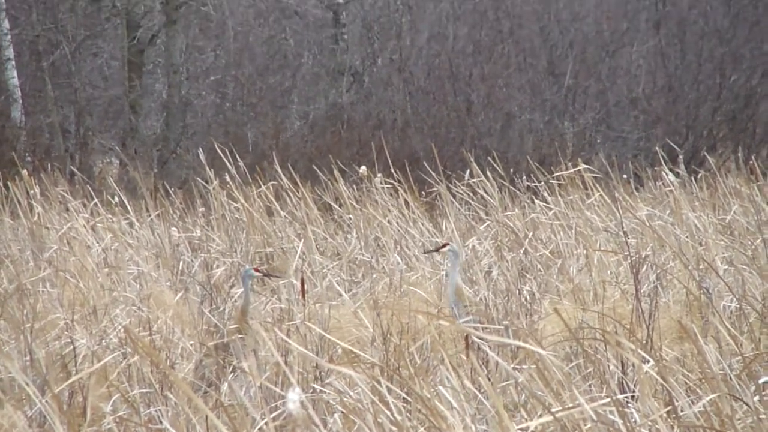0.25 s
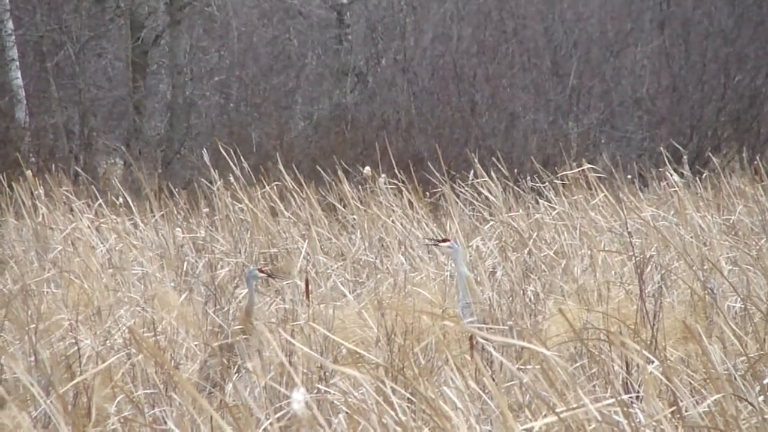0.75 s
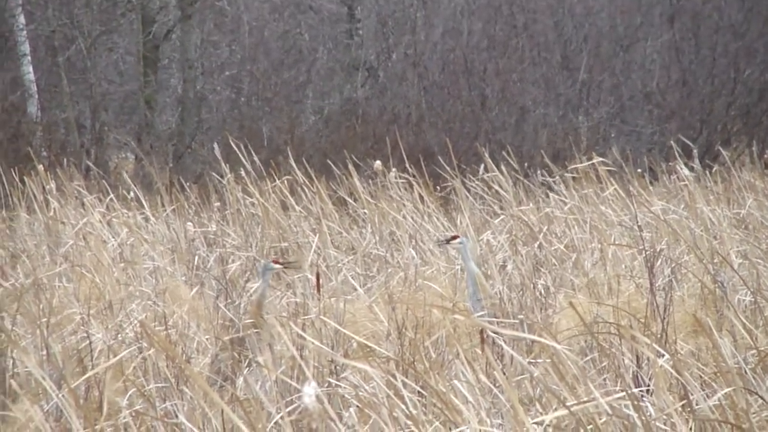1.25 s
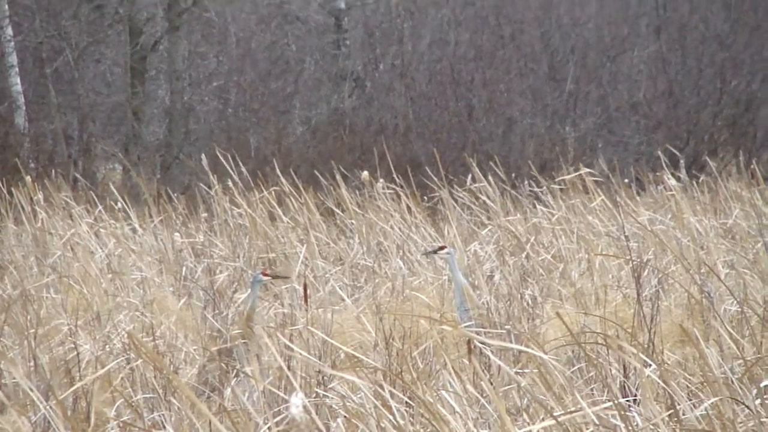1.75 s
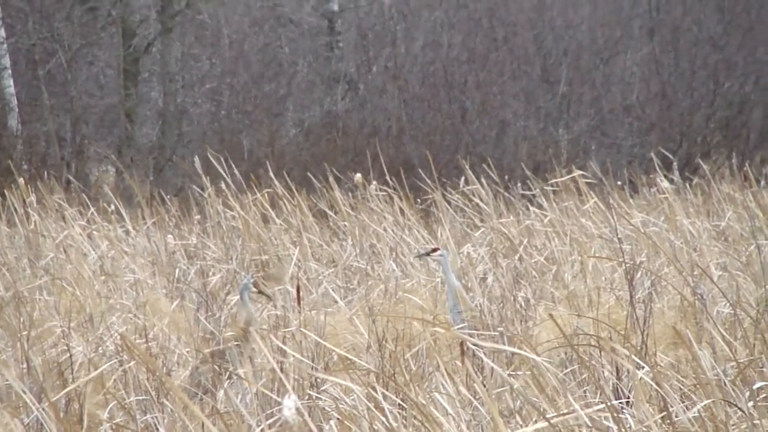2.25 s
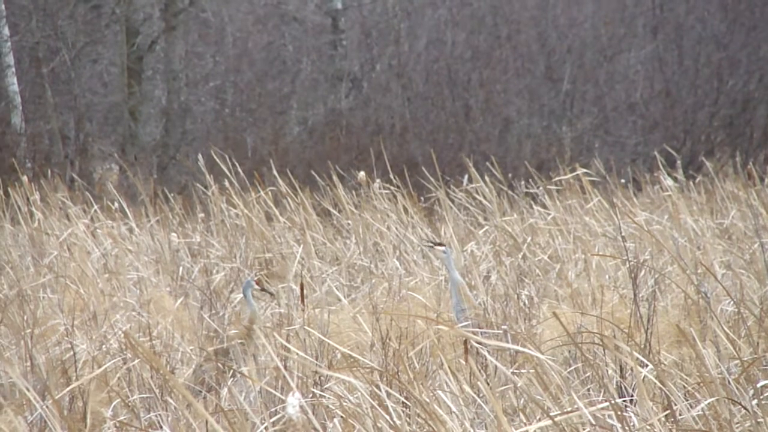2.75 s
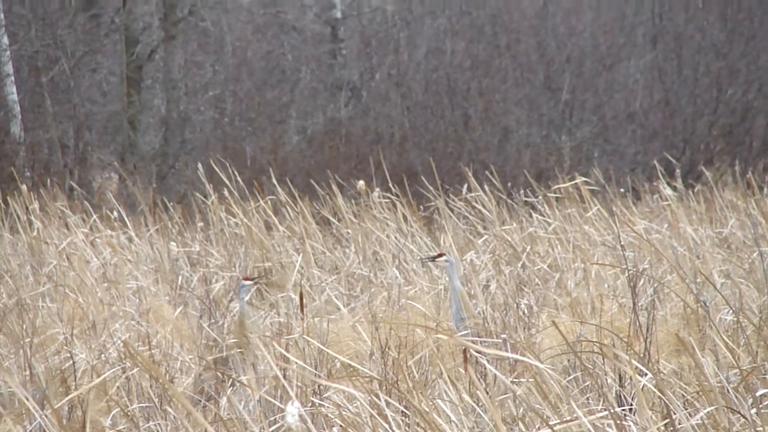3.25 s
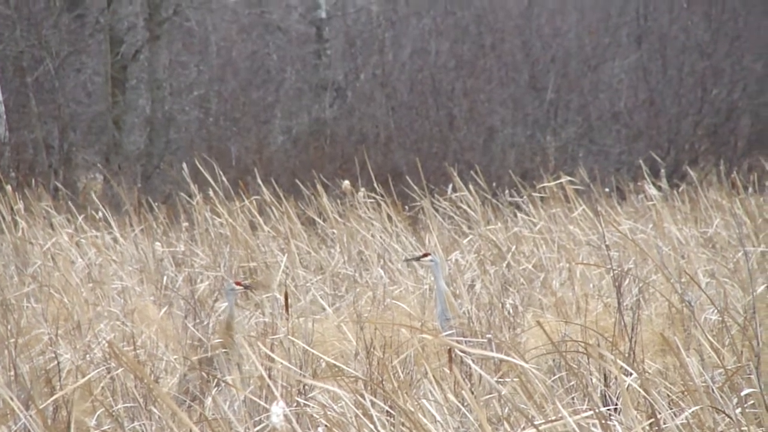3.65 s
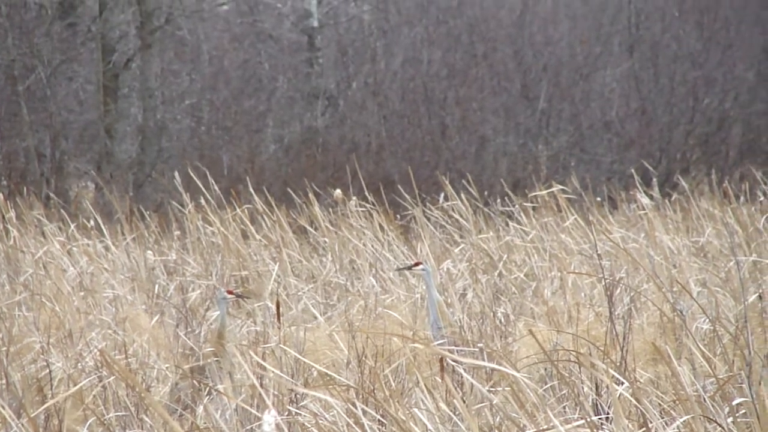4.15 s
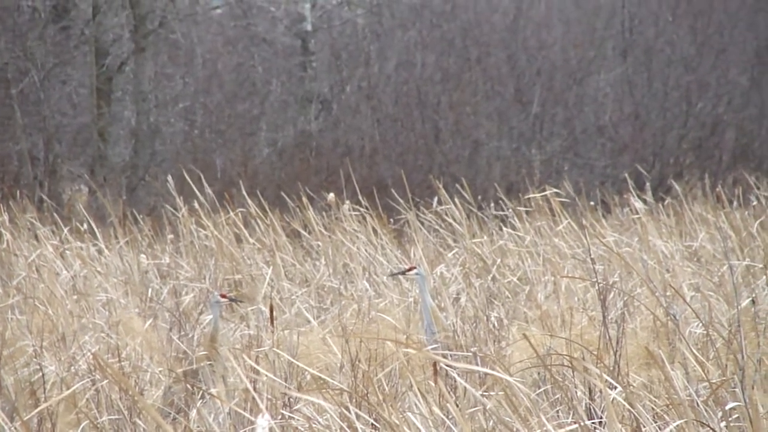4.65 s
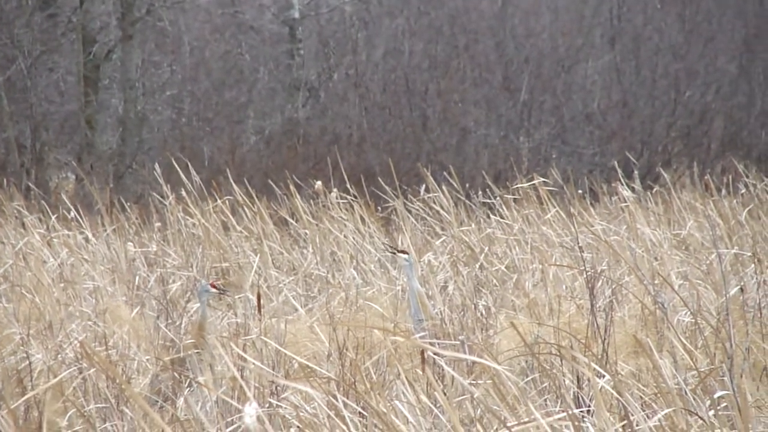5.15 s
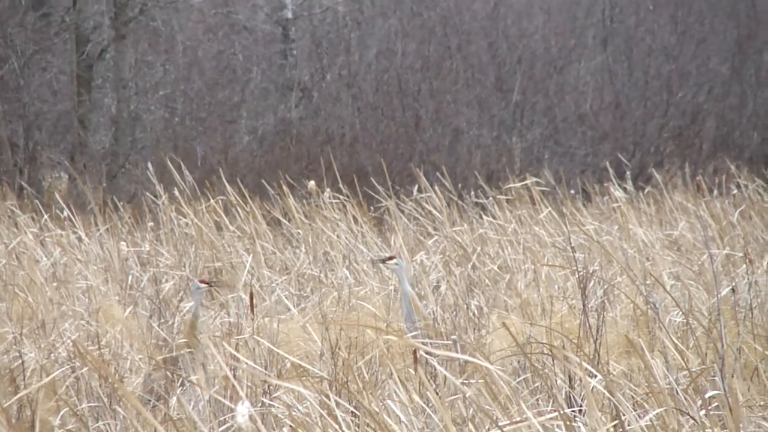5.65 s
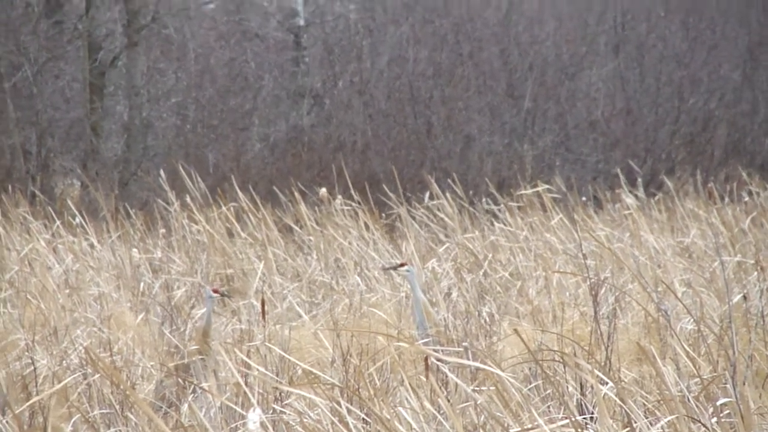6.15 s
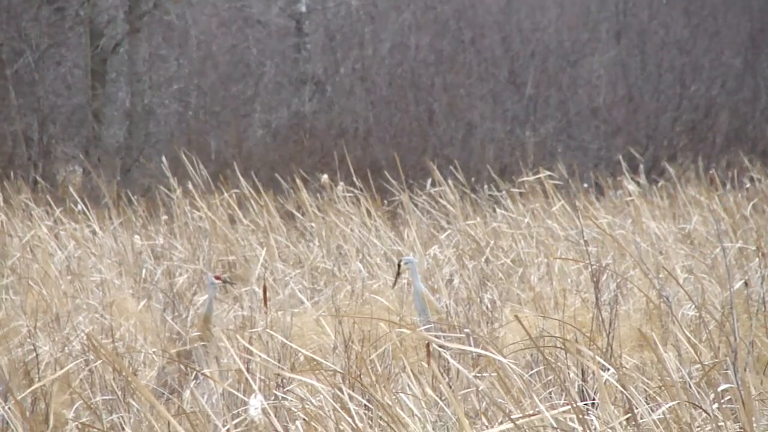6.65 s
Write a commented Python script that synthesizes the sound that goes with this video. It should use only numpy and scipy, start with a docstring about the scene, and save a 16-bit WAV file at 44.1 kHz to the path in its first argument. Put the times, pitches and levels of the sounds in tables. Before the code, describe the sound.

Outdoors in a dry cattail marsh beside a wood, soft steady air hiss and one faint far chirp lead to a pair of cranes calling loudly together. Three rattling bursts, each under a second, start with a rough low purr and roll into quick low notes with short higher notes. Between them come a dry tick, faint chirps and a buzzing blackbird trill. Echoes linger low in the trees. Single-channel distant pickup.

```python
"""From a cattail marsh at the edge of a wood: a soft wash of air, a lone far chirp, then two sandhill cranes.
They call in unison three times. Each call opens with a purr, a swelling low voice that starts rough, and rolls
on as a rattle: low notes from the male (a burst, then a held tone that shortens to clicks) and short, high
arched ones from the female, which follow his in the first call and begin among his in the other two. After the
first call come a dry tick, far chirps and a blackbird's buzzing trill; near the end, another tick. Reeds and
trees throw the sounds back as scattered echoes, and the wood rings longest down low."""
import sys
import numpy as np
from scipy import signal
from scipy.io import wavfile
from scipy.ndimage import uniform_filter1d

SR = 44100
rng = np.random.default_rng(int(sys.argv[2]) if len(sys.argv) > 2 else 0)


def inscribe(sig):
    """Save sig as 16-bit PCM at rate SR to the path in sys.argv[1].

    A 1-D sig is mono; a 2-D sig holds one channel per row.
    Samples are clipped to [-1, 1] before scaling.
    """
    pcm = np.round(np.clip(np.atleast_2d(sig).T, -1, 1) * 32767)
    wavfile.write(sys.argv[1], SR, pcm.astype(np.int16))


N = 305172

# resonances of windpipe and beak in the low register: (frequency [Hz], gain [dB])
PURR_THROAT = [(250, -16), (350, -1), (460, -2.5), (580, -6.5), (1100, 1.5), (1620, 2), (2150, -3.5),
               (2700, 1), (3250, -2), (3900, -6.5), (5400, -6.5), (6500, -17.5), (10500, -27.5)]
EDGE_HZ = 11090  # top of the recorder's band


def amp(db):
    """Turns decibels into gain."""
    return 10 ** (np.asarray(db) / 20)


def evened(x):
    """Scales to rms 1."""
    return x / np.sqrt(np.mean(x ** 2) + 1e-20)


def read(points, hz):
    """Reads a curve of (frequency, value) points on a log-frequency axis."""
    f, value = np.transpose(points)
    return np.interp(np.log(hz + 1), np.log(f + 1), value)


def add(mix, s, sound):
    """Mixes a sound in at time s."""
    part = mix[round(s * SR):][:len(sound)]
    part += sound[:len(part)]


def wander(size, hz):
    """Random drift of about rms 1, up to about hz: straight lines between chance values."""
    steps = np.arange(size) * 4 * hz / SR + rng.random()
    knots = rng.standard_normal(size // 8 + 4)
    # straight lines lose a third of the power
    return np.interp(steps, np.arange(len(knots)), knots) * np.sqrt(3 / 2)


def gate(t, length, rise, fall):
    """Opens at zero and shuts at length, with soft edges."""
    closing = 1 + np.exp(np.clip((t - length) / fall, -50, 50))
    return np.clip(t / rise, 0, 1) / closing


def colour(x, points, size=2048):
    """Causal, minimum-phase filter with the given spectrum: every pulse rings after it strikes."""
    log_gain = np.log(amp(read(points, abs(np.fft.fftfreq(size, 1 / SR)))))
    taps = np.fft.ifft(np.exp(np.conj(signal.hilbert(log_gain)))).real
    return signal.fftconvolve(x, taps[:size // 2])[:len(x)]


def air():
    """Steady far wind in reeds and trees, with faint drifting patches, over a thin hiss."""
    # spectrum of the far wind and hiss: (frequency [Hz], relative level [dB per Hz])
    wind = [(25, -52), (55, -7), (100, -4.5), (220, -5.5), (400, -2.5), (650, 2), (950, -2.5), (1250, -2),
            (1750, -9.5), (2800, -12), (5000, -15), (7000, -17.5), (11000, -19.5)]
    # narrow peaks in the hiss: (frequency [Hz], width [Hz], lift [dB])
    hiss_peaks = [(2170, 130, 5.5), (4300, 250, 5), (6000, 200, 3), (7880, 50, 4.5)]
    air_db, patch_db = -53.5, 1.0
    frames, hz = N // 512 + 5, np.fft.rfftfreq(2048, 1 / SR)
    a, b, patches = rng.standard_normal((3, frames, len(hz)))
    patches = uniform_filter1d(patches, size=8, axis=0)  # smooth in time
    patches = evened(uniform_filter1d(patches, size=6, axis=1))  # smooth in frequency
    level_db = read(wind, hz)
    for f, width, db in hiss_peaks:
        level_db = level_db + db * np.exp(-.5 * ((hz - f) / width) ** 2)
    z = (a + 1j * b) * amp(level_db + patch_db * patches) * (hz < EDGE_HZ)
    noise = signal.istft(z.T, nperseg=2048, noverlap=1536)[1][:N]
    return amp(air_db) * evened(noise)


def trill(throb=0.24, sweep=-0.038, whistle_hz=3150, whistle_db=-4.5):
    """The blackbird's closing trill: a clear, fluttering whistle inside a buzz; it swells a little."""
    # noisy partials of the buzz: (frequency [Hz], width [Hz], relative level [dB])
    partials = [(2590, 120, -1), (3020, 330, -4.5), (3340, 530, -5), (4500, 340, -13), (4800, 70, -12.5)]
    start_s, length_s, end_db, swell_db = 2.295, 0.54, -53, 3.5
    t, flutter_hz = np.arange(N) / SR, 29
    cycle = (t * flutter_hz) % 1
    turns = np.cumsum(1 + sweep * (cycle - .5)) / SR  # pitch falls in every flutter
    buzz = np.zeros(N)
    for hz, width, level in partials:
        blurred = wander(N, width / 2) + 1j * wander(N, width / 2)
        buzz += amp(level) * (blurred * np.exp(2j * np.pi * hz * turns)).real
    whistle = np.sin(2 * np.pi * whistle_hz * turns)
    song = evened(buzz) + amp(whistle_db) * evened(whistle)
    since = t - start_s
    swell = amp(end_db - swell_db * np.clip(1 - since / length_s, 0, 1))
    throbbing = evened(song * (1 - throb * np.cos(2 * np.pi * cycle)))
    return throbbing * gate(since, length_s, rise=.005, fall=.02) * swell


def far_birds(blur=0.041):
    """Single far chirps, each a gliding sine with an unsteady pitch, and the blackbird's trill."""
    # chirps: (time [s], level [dB], pitch [Hz], length [s], glide [share of the pitch])
    chirps = [(0.281, -55, 1228, 0.094, -0.12), (1.841, -53.5, 1443, 0.051, 0.079),
              (2.027, -55.5, 1350, 0.051, 0.1), (2.254, -47.5, 2450, 0.023, .15),
              (2.296, -57, 3450, 0.035, 0.037), (2.298, -60, 5100, 0.017, 0.017),
              (2.4, -51, 2460, 0.031, 0.044), (4.983, -51, 2320, 0.034, 0.092)]
    out = trill()
    for s, db, hz, length, glide in chirps:
        u = np.linspace(0, 1, int(length * SR))
        pitch = hz * (1 + glide * (u - .5) + blur * wander(len(u), 300))
        tone = np.sin(2 * np.pi * np.cumsum(pitch) / SR)
        add(out, s, amp(db) * np.sqrt(2) * np.sin(np.pi * u) * tone)
    return out


def syrinx(hz, tilt_db, throat, rasp):
    """One sharp snap a cycle; rasp adds uneven shapes and puffs of air noise. Leaves the throat near rms 1."""
    k = np.arange(1, int(EDGE_HZ / np.mean(hz)) + 2)[:, None]  # harmonic numbers
    turns = np.cumsum(hz) / SR + .5
    chance = np.array([wander(len(hz), 130) + 1j * wander(len(hz), 130) for _ in k])
    unsteady = np.minimum(k / 4, 1) * chance * (.15 + 1.3 * rasp)  # the lowest harmonics are steadier
    heights = amp(tilt_db * np.log2(k)) * np.exp(.16 * unsteady.real + .5j * unsteady.imag)
    pulses = -(heights * np.exp(2j * np.pi * k * turns)).sum(0).real
    opening = np.cos(np.pi * turns) ** 2
    puffs = opening * rng.standard_normal(len(hz)) * np.linalg.norm(heights[1:], axis=0)
    loudness = np.linalg.norm(heights * amp(read(throat, k * hz)), axis=0)
    return (pulses + rasp * puffs) * np.sqrt(2) / loudness


def low_voice(t, hz, rough, bright_db=1.7, soft_db=-0.5):
    """The low register: when rough, the membranes stutter and lose their pitch."""
    jitter, stutter_db, stutter_hz, rasp = .05, 7, 135, .55
    pitch = hz * (1 + jitter * rough * wander(len(t), 260))
    beats = np.cumsum(stutter_hz * (1 + .3 * wander(len(t), 60))) / SR
    # the voice comes in quick bunches
    stutter = evened(amp(stutter_db * rough * np.sin(2 * np.pi * beats)))
    return stutter * syrinx(pitch, soft_db + bright_db * rough, PURR_THROAT, rasp * rough)


def purrs():
    """Low notes before and under the rattle: purrs scoop up, clear and swell; rough grunts fade and sink."""
    # purrs: (time [s], length [s], top level [dB], first pitch [Hz], last pitch [Hz], last roughness [0-1])
    purr_notes = [(0.623, 0.049, -31, 518.5, 535, 0.09), (1.031, 0.051, -26.5, 562.5, 587.4, 0.25),
                  (2.825, 0.043, -25.5, 531, 704.6, 0.73), (3.104, 0.042, -33, 588, 635, 0.85),
                  (5.110, 0.047, -27, 535.5, 544, 0.17), (5.338, 0.058, -29, 573, 582, .15)]
    # short grunts: (time [s], length [s], first level [dB], first pitch [Hz])
    grunts = [(1.015, 0.015, -30, 537), (1.158, 0.017, -31, 499), (2.815, 0.0066, -35.5, 428),
              (3.261, 0.031, -34, 599), (3.362, .016, -39, 486), (5.099, 0.0082, -36, 468),
              (5.642, 0.022, -35, 574), (5.689, 0.018, -42, 496)]
    scoop, scoop_s, swell_db = 0.1107, 0.00665, 9  # scoop as a share of the pitch
    first_rough, clearing_s, grunt_rough = .95, .011, .75
    grunt_fade_db, grunt_sag = 13, 0.088  # sag as a share of the pitch
    rise, release_s = .0015, 0.0016
    out, t = np.zeros(N), np.arange(int(.08 * SR)) / SR
    for s, length, db, first_hz, last_hz, last_rough in purr_notes:
        u = np.minimum(t / length, 1)
        hz = (first_hz + (last_hz - first_hz) * u) * (1 - scoop * np.exp(-t / scoop_s))
        rough = last_rough + (first_rough - last_rough) * np.exp(-t / clearing_s)
        level = amp(db - swell_db * (1 - u)) * gate(t, length, rise, release_s)
        add(out, s, level * low_voice(t, hz, rough))
    for s, length, db, hz in grunts:
        u = np.minimum(t / length, 1)
        level = amp(db - grunt_fade_db * u) * gate(t, length, rise, release_s)
        add(out, s, level * low_voice(t, hz * (1 - grunt_sag * u), grunt_rough))
    return colour(out, PURR_THROAT)


def male(leap=0.1336, burst_tilt_db=1, held_tilt_db=-2.0, dulling_db=50, sag_per_s=0.79):
    """Each note bursts out with a leap of pitch, catches roughly, then settles on a softer tone that sinks."""
    # his notes, which shorten through each rattle until little but a click is left:
    # (time [s], level [dB], length [s])
    notes = [(0.741, -24, 0.031), (0.8186, -20.5, .024), (.8850, -21, 0.023), (0.9455, -21.5, 0.025),
             (1.0040, -22.5, 0.019), (1.0582, -22.5, 0.0087), (1.0684, -22.5, 0.0027),
             (1.109, -22.5, 0.0033), (2.9475, -20.5, 0.028), (3.0226, -19.5, 0.023), (3.0880, -19, 0.021),
             (3.1480, -20, 0.019), (3.2032, -20.5, 0.014), (3.2573, -21.5, 0.012), (3.3090, -22.5, 0.0033),
             (3.364, -37, 0.0032), (5.2278, -21, 0.038), (5.3043, -19.5, 0.025), (5.3688, -19, 0.018),
             (5.4303, -19.5, 0.015), (5.4842, -20, 0.02), (5.5383, -20.5, 0.015), (5.5912, -20, 0.0021),
             (5.599, -23, 0.0033), (5.6392, -20.5, 0.0027), (5.654, -31, 0.002)]
    # resonances of his windpipe and beak: (frequency [Hz], gain [dB])
    throat = [(250, -19.5), (550, -6.5), (820, -1.5), (1150, 1.5), (1620, 6), (2100, -6), (2700, 2),
              (3900, -0.5), (4800, 2.5), (5500, 2.5), (6500, -6), (7800, -12.5), (10500, -20.5)]
    # his pitch follows his effort: the pitch at a usual level, and its rise with level
    usual_hz, usual_db, hz_per_db = 798.5, -20, 2
    # every note opens with the same burst; the held tone after it is softer and fades
    burst_s, held_db, held_rise_s, held_release_s, held_fade_db_per_s = 0.004, -2.5, 0.0025, 0.0042, 168
    out, t = np.zeros(N), np.arange(int(.07 * SR)) / SR
    catch = np.exp(-((t - .008) / .003) ** 2)
    pressure = np.exp(-((t - .0025) / .0034) ** 2)
    jitter = .022 + .045 * catch + .035 * pressure
    shimmer_db, rasp = .6 + 1.6 * catch, .6
    sag = sag_per_s * t
    held_level = amp(held_db - held_fade_db_per_s * (t - burst_s))
    tilt_db = held_tilt_db + (burst_tilt_db - held_tilt_db) * pressure - dulling_db * t
    for s, db, length in notes:
        burst = gate(t, min(length, burst_s), .001, .0007)
        # the held tone starts just before the burst ends
        held = gate(t - burst_s * 0.88, length - burst_s, held_rise_s, held_release_s) * held_level
        hz = usual_hz + hz_per_db * (db - usual_db)
        pitch = hz * (1 + leap * pressure - sag + jitter * wander(len(t), 330))
        level = amp(db) * (burst + held) * amp(shimmer_db * wander(len(t), 340))
        add(out, s, level * syrinx(pitch, tilt_db, throat, rasp))
    return colour(out, throat)


def female(arch=0.25, crest=0.37, dulling_db=19):
    """About ten cycles a fresh note: the pitch arches, and the pulses round off as the pressure drops."""
    # her runs, one a call: (time she is spent [s], fresh level [dB], brightness [dB per octave],
    # starts of her notes [s])
    runs = [(1.45, -20.5, 3.5, [1.1471, 1.2105, 1.2678, 1.319, 1.369, 1.417]),
            (3.57, -19.5, 3.5, [3.2092, 3.2695, 3.3224, 3.3745, 3.4232, 3.4729, 3.5199, 3.5655]),
            (5.82, -21, 5, [5.456, 5.5186, 5.573, 5.6259, 5.676, 5.724, 5.7717, 5.8189])]
    # resonances of her windpipe and beak: (frequency [Hz], gain [dB])
    throat = [(300, -51.5), (650, -0.5), (980, 9), (1400, -1), (2000, 1), (3000, -1), (3900, -8.5),
              (5000, -1.5), (5900, -10), (6900, -15.5), (8500, -20), (10500, -28)]
    # her notes while fresh, and how they sink, soften and shorten as she tires toward the end of a run
    fresh_hz, fresh_s = 1028.6, 0.0096
    tiring_s, sag_hz, drop_db, shorter_s = 0.071, 156, 5, 0.0035
    out, t = np.zeros(N), np.arange(int(.025 * SR)) / SR
    jitter, rasp, rise, fall = .032, .7, .0038, .0008
    for spent_s, fresh_db, bright_db, starts in runs:
        for s in starts:
            tired = np.exp((s - spent_s) / tiring_s)
            hz = fresh_hz - sag_hz * tired
            db = fresh_db - drop_db * tired
            length = fresh_s - shorter_s * tired
            past_crest = np.minimum(t / length, 1.2) - crest
            pitch = hz * (1 - arch * past_crest ** 2 + jitter * wander(len(t), 318))
            tilt_db = bright_db - dulling_db * np.maximum(past_crest, 0)
            level = amp(db) * gate(t, length, rise, fall)
            add(out, s, level * syrinx(pitch, tilt_db, throat, rasp))
    return colour(out, throat)


def echo(x, delay, db):
    """A single near reflection: a delayed, softer copy."""
    return amp(db) * np.r_[np.zeros(int(delay * SR)), x][:N]


def treble(x, from_hz=5100):
    """Lowers or lifts the top of the calls, gliding from one to the next; the first is the dullest."""
    # treble in the three calls: (time [s], level [dB])
    tops = [(1.1, -6.5), (3.2, 1.2), (5.5, 0.6)]
    s, db = np.transpose(tops)
    highpass = signal.butter(2, from_hz, "highpass", fs=SR, output="sos")
    top = signal.sosfiltfilt(highpass, x)
    return x + (amp(np.interp(np.arange(N) / SR, s, db)) - 1) * top


def scatter(x, spectrum, t60, delay, rise):
    """Many faint echoes that arrive in clumps; each band has its own strength and dies at its own speed."""
    t = np.arange(2 * SR) / SR
    taps = rng.choice([-1., 1.], len(t)) * (rng.random(len(t)) < 4000 / SR)  # about 4000 echoes a second
    taps *= amp(5 * np.tanh(wander(len(t), 25)))  # the clumps
    hz, frame_s, z = signal.stft(taps, SR, nperseg=256)
    decay = amp(-60 * frame_s / read(t60, hz)[:, None])
    z = z * decay * (1 - np.exp(-frame_s / rise))
    # every band is evened in energy, then given its strength
    z *= amp(read(spectrum, hz))[:, None] / np.sqrt((abs(z) ** 2).sum(1, keepdims=True) * 256 ** 2 / 3)
    tail = np.r_[np.zeros(int(delay * SR)), signal.istft(z, SR, nperseg=256)[1]]
    return signal.fftconvolve(x, tail)[:N]


def snaps(decay=0.0029):
    """Faint, bright ticks, as of dry reeds: noise that dies within milliseconds."""
    # ticks: (time [s], level [dB])
    ticks = [(1.701, -30.5), (6.802, -34.5)]
    out, t = np.zeros(N), np.arange(SR // 30) / SR
    for s, db in ticks:
        add(out, s, amp(db) * np.exp(-t / decay) * rng.standard_normal(len(t)))
    return colour(out, [(500, -21), (3000, -1.5), (10000, -16)])


def scene():
    """The pair in the reeds, the wood behind them, and the marsh around."""
    # scatter from the reeds: (frequency [Hz], level against the direct sound [dB])
    reed_spectrum = [(300, -7), (780, 2.5), (1100, -25.5), (1600, -18), (2200, -17.5), (3000, -14),
                     (5000, -19), (10000, -15)]
    # echo from the wood: (frequency [Hz], level against the direct sound [dB])
    wood_spectrum = [(300, -67), (600, 2.5), (800, -4.5), (1000, -12), (1300, -4.5), (1650, -11.5),
                     (2100, -12), (3000, -15), (5000, -16), (10000, -12.5)]
    # decay of the wood's echo: (frequency [Hz], time to fall 60 dB [s])
    wood_t60 = [(300, 2.8), (900, 2.22), (1800, 1.45), (3000, 0.82), (5000, 0.37), (10000, 0.23)]
    reed_t60 = [(500, 0.34), (1000, 0.12), (3000, 0.3), (10000, 0.11)]
    birds, high_notes = far_birds(), female()
    cranes = treble(purrs() + male() + high_notes + echo(high_notes, delay=0.0093, db=-11.5))
    reeds = scatter(cranes, reed_spectrum, reed_t60, delay=.009, rise=0.001)
    # the far birds send more of their sound by way of the wood
    wood = scatter(cranes + amp(5.5) * birds, wood_spectrum, wood_t60, delay=0.026, rise=0.014)
    return (air() + birds + cranes + reeds + wood + snaps())[None]


def record(dry):
    """The recorder's band limit, one channel."""
    lowpass = signal.firwin(511, EDGE_HZ, window=("kaiser", 8), fs=SR)
    return signal.oaconvolve(dry, lowpass[None], "same")


dry = scene()
out = record(dry)
inscribe(out)
```